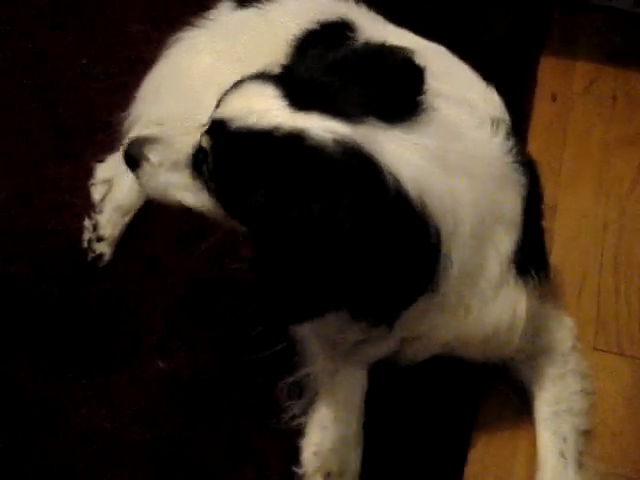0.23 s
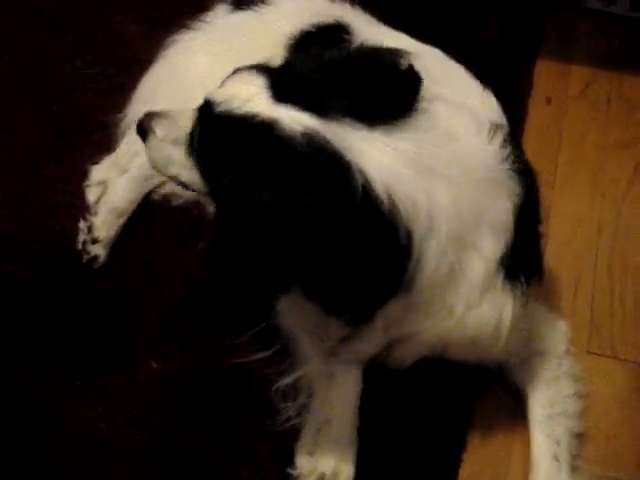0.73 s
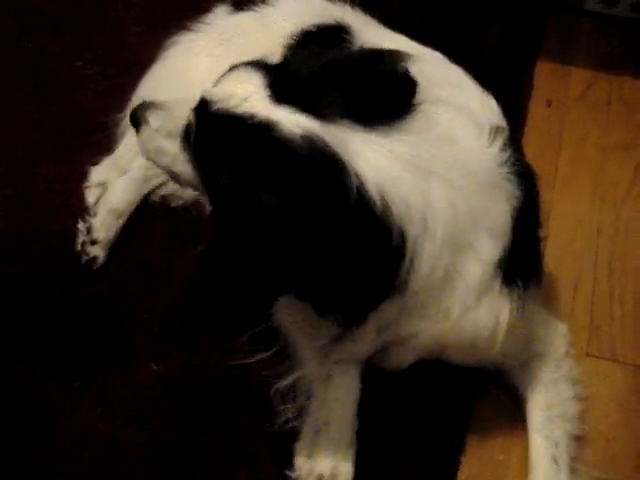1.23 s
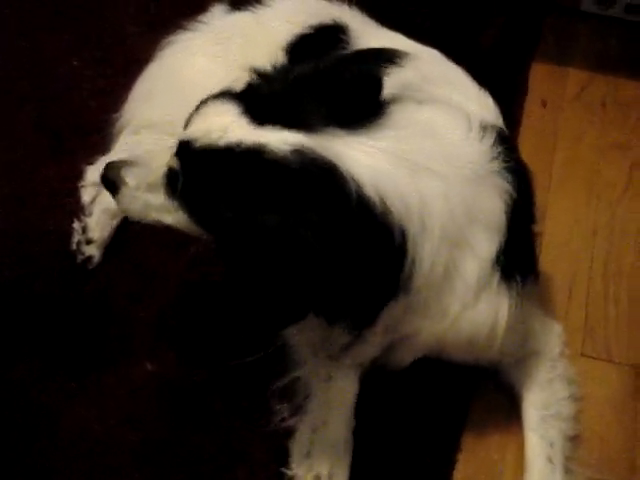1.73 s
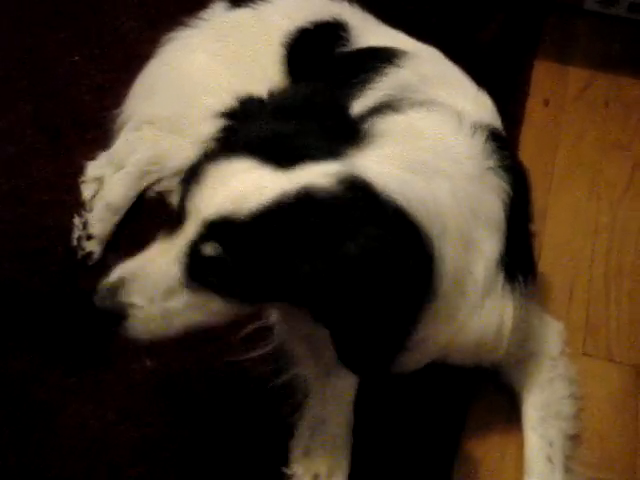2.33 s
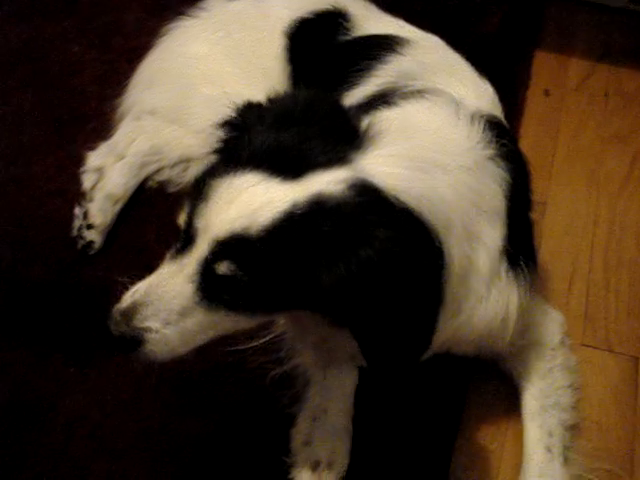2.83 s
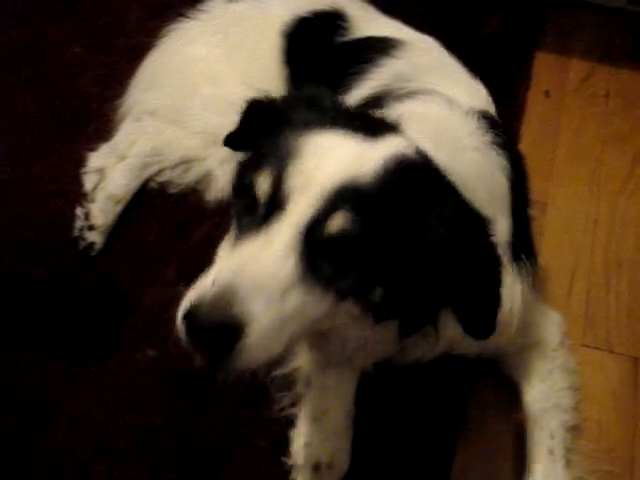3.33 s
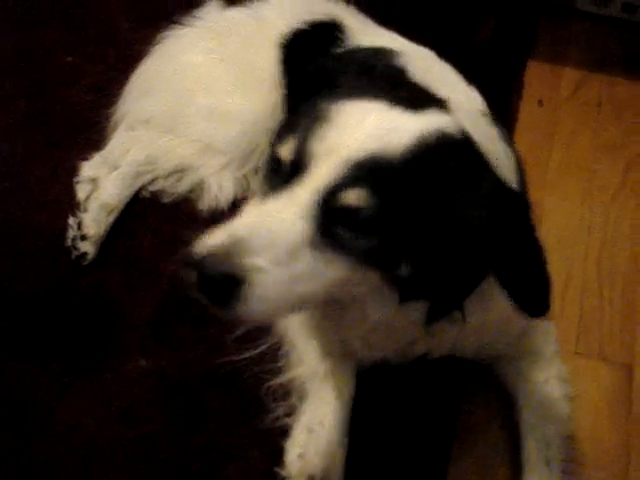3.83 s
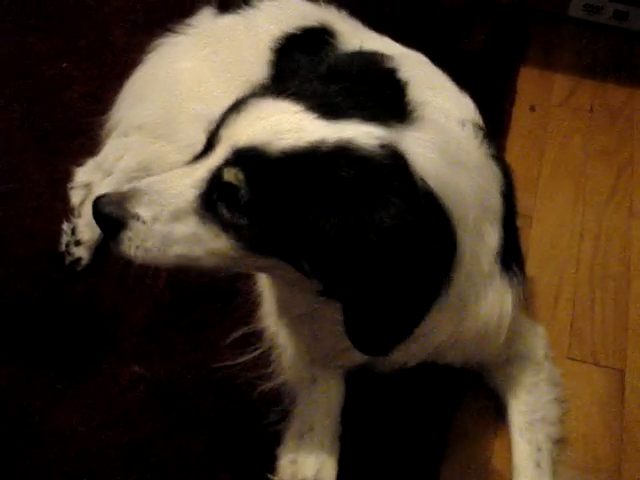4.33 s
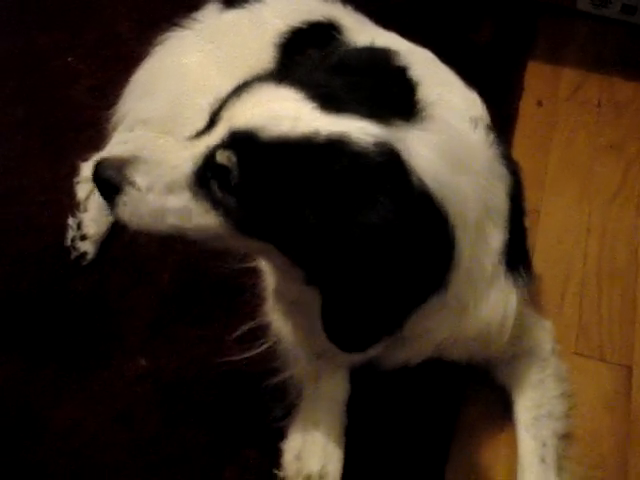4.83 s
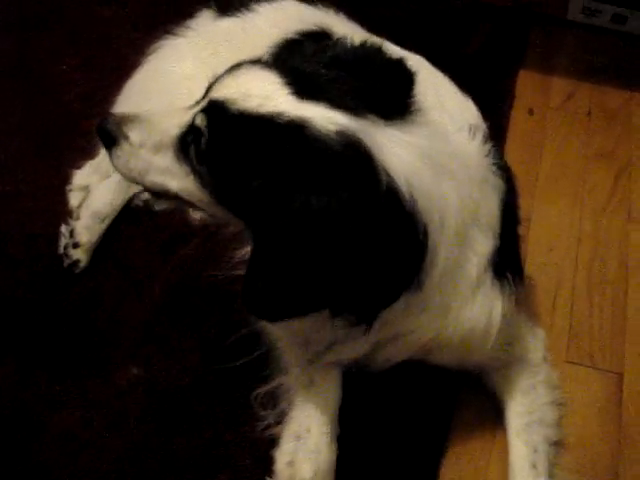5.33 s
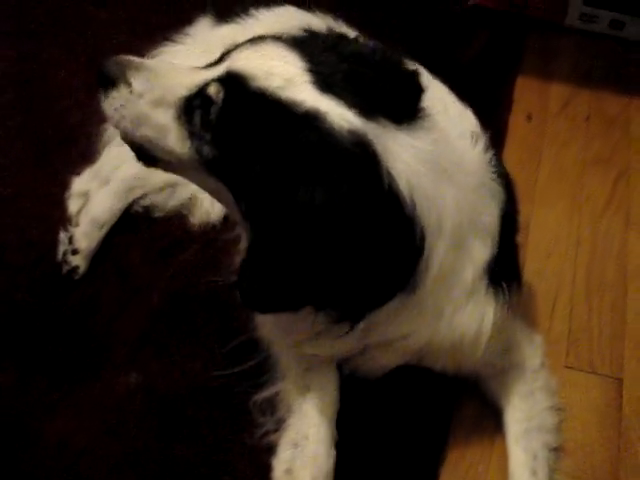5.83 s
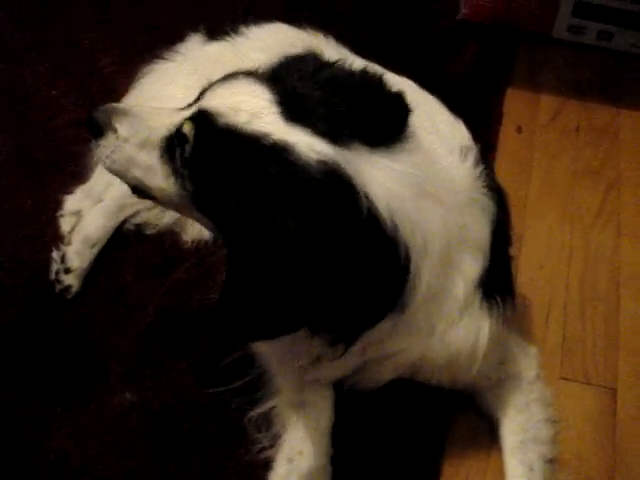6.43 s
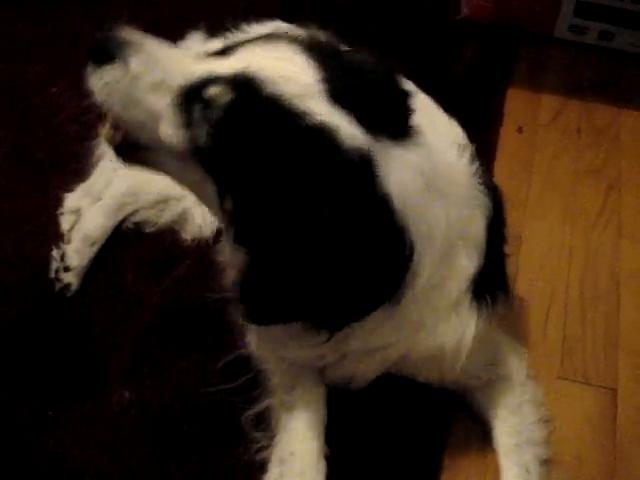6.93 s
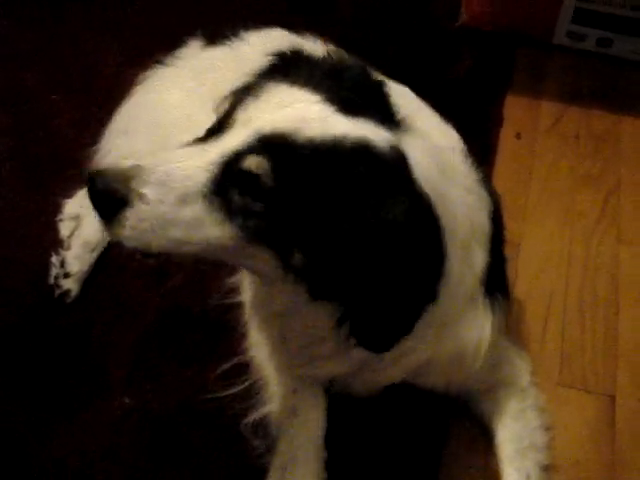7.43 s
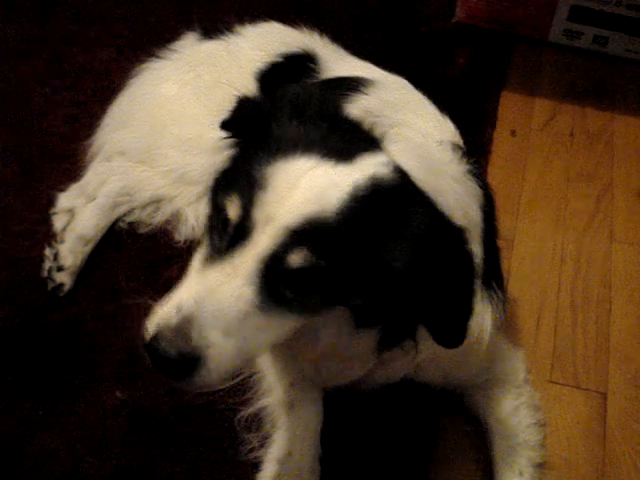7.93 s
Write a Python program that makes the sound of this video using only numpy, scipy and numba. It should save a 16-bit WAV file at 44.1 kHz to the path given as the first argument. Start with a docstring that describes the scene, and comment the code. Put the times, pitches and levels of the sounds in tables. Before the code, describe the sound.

A dog close by howls again and again, each cry growling up from a low rattle into a sung arch, with short pauses in a quiet room.

```python
"""A dog's howl is already sounding close to the microphone in a quiet room; more follow, eight in all.
Slack folds rattle at low pitch, then stretch into a sung arch and let go; the eighth is cut off by the end.
The voice is three sine partials plus overtones rung by throat, mouth and muzzle; a whimper is almost a sine.
Lip clicks are short rings with noise, and noise bursts crackle in the fourth and seventh howls.
Near surfaces and walls answer at once over uneven room noise and hiss; the microphone rounds off big swings."""
import sys
import numpy as np
from scipy import signal
from scipy.fft import rfft, irfft
from scipy.io import wavfile
from scipy.ndimage import uniform_filter1d
from numba import njit

SR = 44100
rng = np.random.default_rng(int(sys.argv[2]) if len(sys.argv) > 2 else 0)


def materialize(psi):
    """Save the field psi as 16-bit PCM at rate SR to the path in sys.argv[1].

    A 1-D psi becomes a single channel; in a 2-D psi each row is a channel.
    """
    bounded = np.clip(np.atleast_2d(psi).T, -1, 1)
    quanta = np.round(bounded * 32767).astype(np.int16)
    wavfile.write(sys.argv[1], SR, quanta)


N = 360738

# The howls in order. Each row: start in seconds, extra level of the opening rattle in dB, mouth resonance
# at the start in Hz, at the end in Hz, then trims of bass, narrow middle band and treble in dB.
HOWLS = [(-.15, 0, 2040, 1950, 2, 5.5, 1.5), (.615, 2.5, 2274, 1815, 5, 4.5, 1),
         (1.78, 0, 1834, 2074, 2.5, 1, 0), (2.785, 2.5, 1530, 2780, 0, -2, 2),
         (4.211, 6, 1935, 1740, -2.5, -3.5, -3), (5.365, 0.5, 1380, 2770, -4, -3.5, 1.5),
         (6.675, 8.5, 2043, 2773, -5.5, 3.5, 0), (8.059, -1, 1737, 1743, 0.5, -6, -1)]
# The sung arch of each howl, one list per howl. Each row: time in seconds, pitch in Hz,
# level in dB before the path gain, slope of the harmonics in dB per octave.
ARCHES = [
    [(0.0, 342, -7, -17), (0.014, 352.7, -6, -21.5), (0.181, 352.1, -3.5, -21), (0.21, 272, -13, -18.5)],
    [(0.78, 281.7, -7.5, -19), (0.823, 371.6, -6.5, -22), (0.858, 360, -5, -21.5), (0.887, 409.5, -4, -21),
     (1.051, 452, -17.5, -13.5), (1.186, 479.5, -21, -7.5), (1.342, 430.3, -13, -12),
     (1.364, 383.6, -3.5, -17.5), (1.378, 301, -9.5, -24)],
    [(1.93, 300, 0, -21.5), (1.966, 349.5, -8, -21), (2.073, 392, -14.0, -11), (2.208, 418.6, -11.5, -13.5),
     (2.322, 403.8, -14, -9.5), (2.358, 345, -10.5, -23), (2.372, 290.3, -7.5, -24.5)],
    [(2.915, 271, -1.5, -20.5), (2.972, 361, -9.5, -21.5), (2.993, 368.4, -10.5, -15.5),
     (3.162, 454.6, -10, -12), (3.233, 523.7, -6.5, -9), (3.431, 565.2, -11.5, -10.5),
     (3.6, 544.7, -9.5, -12), (3.721, 471, -6, -17), (3.77, 385, -9.5, -20.5)],
    [(4.355, 295.8, -8.0, -19), (4.518, 373.4, -14, -15.5), (4.738, 424, -7, -15.5),
     (4.866, 433.2, -9, -12.5), (4.908, 401.5, -8, -14.5), (4.93, 421.4, -11.0, -14),
     (4.958, 280.4, -8, -22)],
    [(5.49, 295, -4.5, -17), (5.583, 421, -9.5, -13.5), (5.647, 458.4, -11.5, -7.5),
     (5.753, 517.7, -6.5, -12.5), (5.896, 573, -14, -4), (6.131, 540.7, -9.5, -12.0),
     (6.209, 512, -9, -13.0), (6.266, 434, -14.5, -13), (6.28, 349.8, -10.5, -17.5)],
    [(6.735, 332.7, -12, -16.5), (6.771, 404.5, -15, -11.5), (6.835, 555.8, -13, -5),
     (6.899, 557, -14.5, -3.5), (6.941, 659.4, -8.5, -15), (6.991, 702, -12, -12.5),
     (7.027, 874, -10, -12.5), (7.105, 805, -14.5, -11), (7.183, 527, -18, -13.0),
     (7.233, 484.8, -15.5, -14.5), (7.425, 504.4, -12.5, -12), (7.489, 481, -13, -18.0),
     (7.532, 448, -16.5, -14.5), (7.56, 386.6, -12.5, -18)],
    [(8.125, 275, -8.5, -16.5), (8.165, 332, -13, -10.5)],
]


def undb(db):
    """Decibels to gain."""
    return 10 ** (np.asarray(db) / 20)


def curves(table):
    """Each column of a table, joined by straight lines in time."""
    seconds, *columns = np.transpose(table)
    t = np.arange(N) / SR
    return [np.interp(t, seconds, column) for column in columns]


def gate(table, fade_s=.008):
    """One while the table lasts, with soft edges."""
    t = np.arange(N) / SR
    sounding = (t >= table[0][0]) & (t <= table[-1][0] + fade_s)
    return uniform_filter1d(1. * sounding, int(fade_s * SR) + 1)


def unit(x):
    """Scale to rms 1."""
    return x / np.sqrt(np.mean(x ** 2))


def walk(rate):
    """Smooth chance that changes about rate times a second; rms 1."""
    hold = max(int(SR / rate), 2)
    steps = rng.standard_normal(N)[:N // hold + 1]
    return unit(uniform_filter1d(np.repeat(steps, hold), hold)[:N])


def colour(x, points, size=2048):
    """Causal filter through (Hz, dB) points, built from the cepstrum of the log gain."""
    hz, db = np.transpose(points)
    bins_hz = np.maximum(np.arange(size // 2 + 1) * SR / size, 1)
    gain = undb(np.interp(np.log(bins_hz), np.log(hz), db))
    cepstrum = irfft(np.log(gain))
    # fold the cepstrum forward in time for minimum phase
    cepstrum[1:size // 2] *= 2
    cepstrum[size // 2 + 1:] = 0
    response = irfft(np.exp(rfft(cepstrum)))
    return signal.fftconvolve(x, response)[:len(x)]


def dog(creak_hz=235, wobble=.005, flutter_db=3.5, strain_hz=490):
    """Slack folds rattle unevenly at low pitch; stretched folds sing an almost clean tone."""
    clear_jitter, creak_jitter = .0024, .02
    clear_rasp_db, creak_rasp_db, creak_shimmer_db = -14.5, -20, 2.2
    pitch, gains = larynx()
    slack = 1 / (1 + (pitch / creak_hz) ** 8)
    ease = 1 / (1 + (pitch / strain_hz) ** 20)  # full strain steadies the tone
    jitter = (clear_jitter * (1 + ease) + creak_jitter * slack) * walk(300)
    jitter += wobble * walk(55)
    phase = 2 * np.pi * np.cumsum(pitch * (1 + jitter)) / SR
    rasp = undb(clear_rasp_db + (creak_rasp_db - clear_rasp_db) * slack)
    partials = [np.sqrt(2) * np.sin(k * phase) for k in range(1, 4)]
    partials.append(undb(-2.5) * bite(overtones(phase, pitch, rasp, slack), gains[-1]))
    # each partial flutters on its own, then the whole voice shimmers
    flutter = flutter_db * (.2 + .8 * ease)
    voice = sum(gain * partial * undb(flutter * walk(45)) for gain, partial in zip(gains, partials))
    return voice * undb(-2.13 + (0.66 + creak_shimmer_db * slack) * walk(220))


def larynx(count=16):
    """Pitch of all howls in a row, and gains of the first three harmonics and of the overtones above them."""
    lips_close_hz, lips_span_hz = 2140, 400
    nasal_hz, nasal_width_hz, nasal_db = 852, 217, -15.5
    pitch, gain, brightness = np.full(N, 100.), np.zeros(N), np.zeros(N)
    for (start, rattle_db, *_), arch in zip(HOWLS, ARCHES):
        hz, level, slope, sounding = howl(start, rattle_db, arch)
        on = sounding > 1e-6
        pitch[on] = hz[on]
        brightness[on] = slope[on]
        gain[on] = sounding[on] * undb(level[on])
    # as the lips close, the mouth resonance rises and the nose hollows out the low harmonics
    closed = np.clip((mouth_resonance() - lips_close_hz) / lips_span_hz, 0, 1)

    def nasal(hz):
        """The nose takes a hollow out of the low harmonics."""
        return undb(nasal_db * closed * np.exp(-((hz - nasal_hz) / nasal_width_hz) ** 2))

    paths = [carry(k * pitch) * nasal(k * pitch) for k in (1, 2, 3)]
    # harmonics 4 to count add up in power at every pitch
    scale_hz = np.arange(50., 1000)
    upper_gain = np.sqrt(sum(carry(k * scale_hz) ** 2 for k in range(4, count + 1)))
    paths.append(np.interp(pitch, scale_hz, upper_gain))
    return pitch, [gain * path * undb(brightness * np.log2(k)) for k, path in enumerate(paths, 1)]


def howl(start, rattle_db, arch):
    """Folds speed up from a rattle into the sung arch, then let go: pitch, level, brightness and gate."""
    rattle_hz, rattle_bend, attack_s, attack_db = 88.06, 1.4, 0.043, 15
    drop_hz, release_s, release_db = 228, .055, 28
    t = np.arange(N) / SR
    pitch, level, brightness = curves(arch)
    sung, end = arch[0][0], arch[-1][0]
    climb = np.clip((t - start) / (sung - start), 0, 1)
    attack = np.clip((t - start) / attack_s, 0, 1)
    drop = np.clip((t - end) / release_s, 0, 1)
    pitch = rattle_hz + (pitch - rattle_hz) * climb ** rattle_bend
    pitch += (drop_hz - pitch) * drop
    level += rattle_db * (1 - climb ** 2)
    level -= attack_db * (1 - attack) + release_db * drop
    return pitch, level, brightness, gate([(start,), (end + release_s,)])


def carry(hz):
    """Peaks and hollows on the way to the microphone, through which each harmonic glides, as gain."""
    # Each row: frequency in Hz, gain in dB.
    path_points = [(90, -42.5), (200, -32), (280, -19), (320, -19), (390, -24), (460, -5.5), (540, 0),
                   (640, 3), (730, 7.5), (980, 0.5), (1110, 0.5), (1260, 7), (1480, -6.5), (1600, -4),
                   (1700, 5.5), (1900, 3), (2270, 5), (3400, 1.5), (7000, -39.5)]
    points_hz, db = np.transpose(path_points)
    return undb(np.interp(np.log(hz), np.log(points_hz), db))


def overtones(phase, pitch, rasp, slack, soft_db=-6, mouth_width_hz=190, mouth_db=8):
    """Fold closures and a puff of turbulence each cycle ring throat and mouth; levelled to about rms 1."""
    # The throat as it colours the overtones. Each row: frequency in Hz, gain in dB.
    throat = [(350, 0), (750, 7), (1000, -6.5), (1350, -0.5), (1580, -16), (2000, -11), (2330, -11),
              (3000, -27.5), (3550, -20.5), (4150, -19), (4800, -35.5), (6300, -32), (8000, -41),
              (10000, -46.5)]
    # Narrow resonances of muzzle and nose. Each row: centre in Hz, width in Hz, level of the added ring in dB.
    muzzle_rings = [(2642, 110, 2.5), (5080, 360, -4.5)]
    # a pulse train of equal harmonics, less the first three
    highest = np.floor(SR / 3 / pitch)
    half = (phase % (2 * np.pi)) / 2 + 1e-9
    closures = np.sin((2 * highest + 1) * half) / (2 * np.sin(half)) - .5
    closures -= sum(np.cos(k * phase) for k in range(1, 4))
    puffs = (1 + 1.2 * np.cos(phase)) * rng.standard_normal(N)
    puffs = colour(puffs, [(200, -16), (800, -10), (2200, -2), (4000, 6), (8000, 11)])
    source = closures / np.sqrt(highest / 2) + rasp * puffs
    # slack folds close softly and sound dull
    dull = colour(source, [(1400, 0.0055), (1900, soft_db), (8000, soft_db)])
    source = (1 - slack) * source + slack * dull
    sound = colour(source, throat)
    mouth = undb(mouth_db) * (1 - slack) * resonance(sound, mouth_resonance(), float(mouth_width_hz))
    muzzle = sum(undb(db) * signal.lfilter(*signal.iirpeak(hz, hz / width, fs=SR), sound)
                 for hz, width, db in muzzle_rings)
    # the nasal side branch carves a hollow under a bright band
    nasal_branch = [(3400, 0), (3800, -15), (4300, -13), (4850, 5), (5800, 1)]
    sound = colour(sound + mouth + muzzle, nasal_branch)
    power = uniform_filter1d(uniform_filter1d(sound ** 2, size=600), size=600)
    return sound / np.sqrt(power + 1e-12)


def mouth_resonance():
    """Jaw and lips glide the mouth resonance evenly through each howl, in Hz."""
    glide = []
    for (start, _, from_hz, to_hz, *_), arch in zip(HOWLS, ARCHES):
        glide += [(start, from_hz), (arch[-1][0], to_hz)]
    return curves(glide)[0]


@njit
def resonance(x, hz, width):
    """State-variable band-pass with a moving centre, gain 1 there."""
    y, band, low = np.empty(len(x)), 0., 0.
    for i in range(len(x)):
        g, damping = np.tan(np.pi * hz[i] / SR), width / hz[i]
        v = (band + g * (x[i] - low)) / (1 + g * (g + damping))
        band = 2 * v - band
        low = low + 2 * g * v
        y[i] = damping * v
    return y


def bite(x, gain, flutter_db=0.8, range_db=7, inertia_s=.12):
    """The top of the voice flutters, and swells less and more slowly than the overtones below it."""
    lag, pivot_db = 0.39, -30  # dB lost per dB that the slow overtone level rises above the pivot
    db, = curves([(s, treble_db) for (start, *_, treble_db), arch in zip(HOWLS, ARCHES)
                  for s in (start, arch[-1][0])])
    overtone_db = 20 * np.log10(gain + 1e-9)
    slow_gain = np.abs(uniform_filter1d(gain, int(inertia_s * SR) + 1))
    steady_db = 20 * np.log10(slow_gain + 1e-9)
    db += np.clip(steady_db - overtone_db - lag * (steady_db - pivot_db), -range_db, range_db)
    treble = signal.sosfiltfilt(signal.butter(6, 4400, "high", fs=SR, output="sos"), x)
    return x + (undb(db + flutter_db * walk(36)) - 1) * treble


def stance(x, bass_hz=285, middle_hz=(1130, 1400), release_s=.055):
    """Each howl has its own share of bass and middle band, as the dog holds its head differently."""
    bass_db, middle_db = curves([(s, bass, middle)
                                 for (start, *_, bass, middle, _), arch in zip(HOWLS, ARCHES)
                                 for s in (start, arch[-1][0] + release_s)])
    bass = signal.sosfiltfilt(signal.butter(4, bass_hz, fs=SR, output="sos"), x)
    middle = signal.sosfiltfilt(signal.butter(2, middle_hz, "band", fs=SR, output="sos"), x)
    return x + (undb(bass_db) - 1) * bass + (undb(middle_db) - 1) * middle


def whimper():
    """A thin, nearly pure tone through the nose: one sine with an unsteady pitch."""
    # Faint closed-mouth whimper after the first howl. Each row: time in seconds, pitch in Hz, rms level in dB.
    whimper_path = [(.26, 303.4, -69), (.35, 298, -65), (.42, 285, -55), (.48, 253.7, -52),
                    (.53, 243.7, -88)]
    pitch, db = curves(whimper_path)
    phase = 2 * np.pi * np.cumsum(pitch * (1 + 0.021 * walk(66))) / SR
    return gate(whimper_path) * undb(db) * np.sqrt(2) * np.sin(phase)


def lips(ring_s=0.0002, spray_s=0.0027, spray_db=-11):
    """Wet lips part: a tiny cavity rings very briefly with a spray of noise."""
    # Lip and tongue clicks. Each row: start in seconds, peak before the band filter in dB, ring in Hz.
    click_list = [(1.552, -33.5, 5865), (1.881, -27.5, 5000), (4.38, -29.5, 5485), (5.354, -33.5, 5170),
                  (5.376, -60, 3958), (5.4, -13, 3200), (7.81, -43, 5103), (7.881, -34, 4604)]
    out, t = np.zeros(N), np.arange(600) / SR
    for s, db, hz in click_list:
        click = np.sin(2 * np.pi * hz * t) * np.exp(-t / ring_s)
        spray = np.diff(rng.standard_normal(len(t) + 1)) / 2
        click += undb(spray_db) * spray * np.exp(-t / spray_s)
        start = int(s * SR)
        out[start:start + len(t)] += undb(db) * click / np.abs(click).max()
    return signal.sosfilt(signal.butter(2, [2000, 7000], "band", fs=SR, output="sos"), out)


def crackle():
    """Short rough bursts of broad noise at set moments within two of the howls."""
    # Each row: middle of the burst in seconds, length in seconds, level of its noise in dB.
    burst_list = [(3.202, 0.037, -35), (3.286, 0.058, -31.5), (6.936, 0.027, -25.5), (7.006, .028, -33)]
    t = np.arange(N) / SR
    bursts = sum(undb(db) * np.exp(-(2 * (t - s) / length) ** 4) for s, length, db in burst_list)
    rough = [(30, -14.0), (100, -3), (700, -1.0), (2500, -1), (4000, -9.0), (10000, -28.0)]
    return bursts * unit(colour(rng.standard_normal(N), rough))


def room(x, t60_s=0.28, build_s=0.0084, scatter_share=0.58):
    """Near surfaces smear each pulse; a short tail and a few standing waves follow."""
    # Short paths over which floor and furniture scatter the sound: delays in seconds.
    scatter_delays = [.0011, .0023, .0037]
    # Standing waves of the room. Each row: frequency in Hz, time to fall 60 dB in seconds, gain in dB.
    standing_waves = [(311, 0.29, -4.5), (709, 0.14, 1.5)]
    t = np.arange(SR // 2) / SR
    hz = np.arange(len(t) // 2 + 1) * SR / len(t)
    # a chain of all-pass echoes
    paths = np.exp(-2j * np.pi * np.outer(scatter_delays, hz))
    allpass = (paths + scatter_share) / (1 + scatter_share * paths)
    response = irfft(np.prod(allpass, axis=0), len(t))
    tail = rng.standard_normal(len(t)) * np.exp(-np.log(1000) * t / t60_s) * (1 - np.exp(-t / build_s))
    # the muzzle beams its treble away from the microphone, so more of it returns from the walls
    walls = [(250, -11), (560, -14), (850, -11), (1500, -8), (3000, -4), (8000, -2)]
    response += colour(tail / np.sqrt(np.sum(tail ** 2)), walls)
    for mode_hz, ring_s, db in standing_waves:
        decay = np.log(1000) / ring_s
        ring = np.exp(-decay * t) * np.sin(2 * np.pi * mode_hz * t)
        response += undb(db) * 2 * decay / SR * ring
    return signal.fftconvolve(x, response)[:N]


def hush(hiss_db=-63):
    """Coloured room noise that sinks and recovers, over steady microphone hiss."""
    # Colour of the room noise. Each row: frequency in Hz, relative level in dB.
    hush_colour = [(25, -21.5), (60, -4.5), (170, -5), (270, -0.5), (420, -4), (570, -4), (860, -2.5),
                   (1050, -7), (2000, -11.5), (4000, -15.5), (7000, -22), (10000, -25.5)]
    # Each row: time in seconds, level of the room noise in dB.
    hush_level = [(0, -51), (2.75, -50.5), (3.8, -60), (4.2, -54.5), (5.05, -53), (5.4, -52), (6.35, -56.5),
                  (6.7, -54), (7.6, -59.5), (8.18, -58.5)]
    db, = curves(hush_level)
    hiss_colour = [(300, -12.5), (900, -0.5), (3000, -2), (7000, -5.5), (10000, -10.5)]
    hiss = unit(colour(rng.standard_normal(N), hiss_colour))
    air = unit(colour(rng.standard_normal(N), hush_colour))
    return air * undb(db) + hiss * undb(hiss_db)


def scene(click_room_db=-17):
    """The dog in its room, over the hush; the thin lip clicks arrive almost dry."""
    clicks = lips()
    in_room = room(stance(dog()) + whimper() + undb(click_room_db) * clicks)
    return (in_room + clicks + crackle() + hush())[None]


def record(dry, low_cut_hz=22, top_hz=9850):
    """The microphone flattens the biggest swings, upward ones sooner; both ends of the band are cut."""
    ceiling, bottom, knee = .54, .72, 8
    limit = np.where(dry > 0, ceiling, bottom)
    clipped = dry / (1 + np.abs(dry / limit) ** knee) ** (1 / knee)
    # the overload is rounded: its buzz fades above the middle range
    buzz = signal.sosfiltfilt(signal.butter(4, 3100, fs=SR, output="sos"), clipped - dry)
    low_cut = signal.sosfilt(signal.butter(1, low_cut_hz, "high", fs=SR, output="sos"), dry + buzz)
    return signal.sosfilt(signal.ellip(10, .2, 70, top_hz, fs=SR, output="sos"), low_cut)


dry = scene()
out = record(dry)
materialize(out)
```